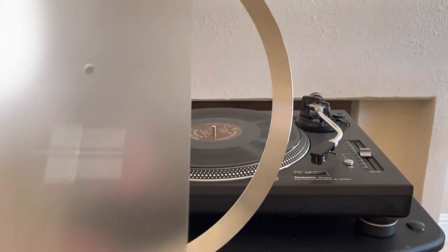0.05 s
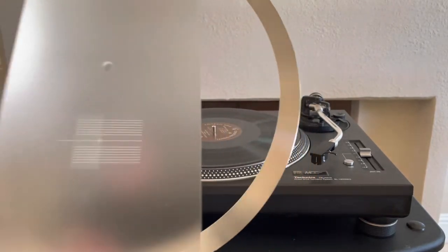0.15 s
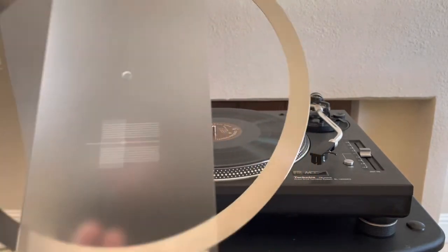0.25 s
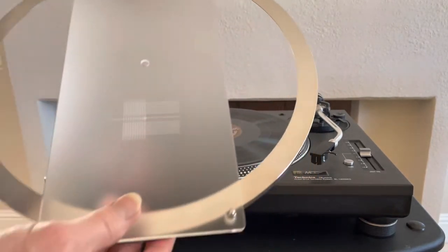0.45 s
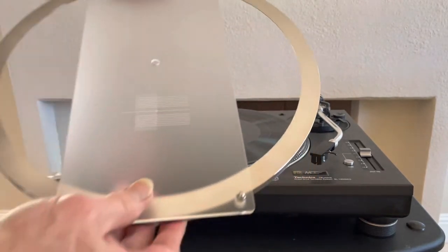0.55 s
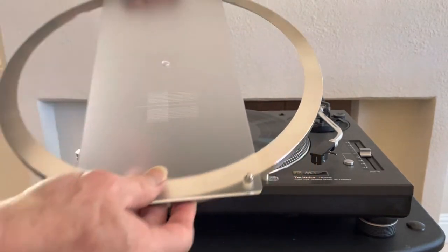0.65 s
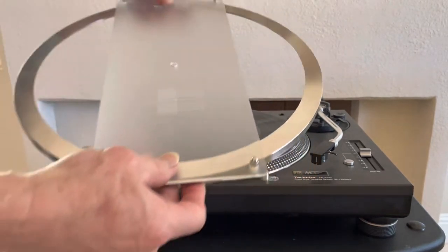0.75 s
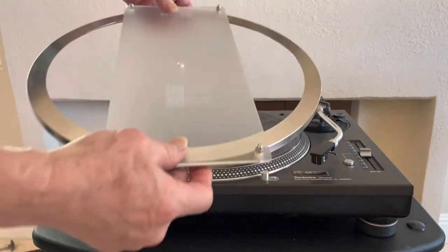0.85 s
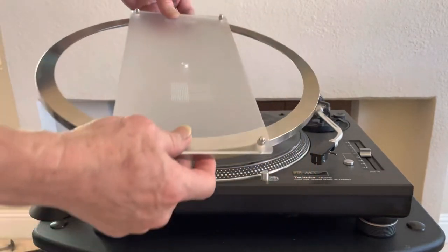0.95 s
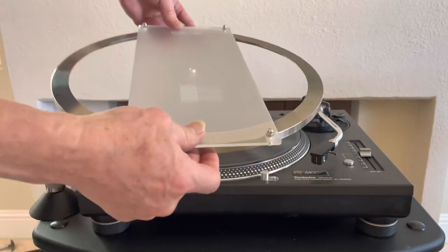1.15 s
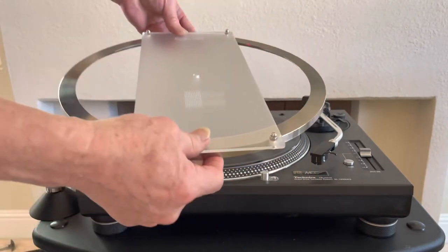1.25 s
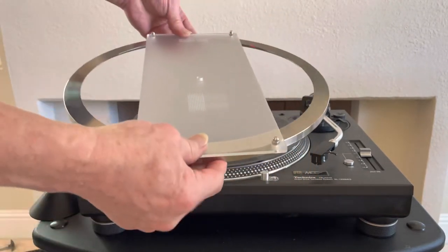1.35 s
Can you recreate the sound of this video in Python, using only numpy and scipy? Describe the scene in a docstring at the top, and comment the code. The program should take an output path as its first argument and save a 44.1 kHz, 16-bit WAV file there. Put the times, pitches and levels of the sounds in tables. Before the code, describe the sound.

A metal ring clacks sharply against a plastic plate, rings briefly, then knocks softly.

```python
"""A heavy metal ring rides on a hard plastic plate, carried through a quiet, bare room.
After a faint rub of the hands, the ring drops against the plate with one sharp clack:
the plate bends and thuds, and the metal sings briefly in beating pairs of modes.
It settles with a soft, damped double knock, then a light tap follows as the plate is set down.
Faint sliding and a low wobble come and go, over a steady bed of room rumble and hum."""
import sys
import numpy as np
from scipy import signal
from scipy.fft import rfft, irfft
from scipy.io import wavfile
from scipy.ndimage import uniform_filter1d

SR = 44100
rng = np.random.default_rng(int(sys.argv[2]) if len(sys.argv) > 2 else 0)


def inscribe(sig):
    """Save sig as 16-bit PCM at rate SR to the path in sys.argv[1].

    A 1-D sig is mono; a 2-D sig holds one channel per row.
    Samples are clipped to [-1, 1] before scaling.
    """
    pcm = np.round(np.clip(np.atleast_2d(sig).T, -1, 1) * 32767)
    wavfile.write(sys.argv[1], SR, pcm.astype(np.int16))


N = 61739

# The bright crack of the hard contact. Each row: frequency in Hz, level in dB.
CRACK_SPECTRUM = [(60, -37), (300, -20), (600, -26), (1100, -14.5), (1800, -15), (3200, -13), (4100, -7.5),
                  (5000, -4), (6300, -14), (7500, -19), (9800, -6), (11400, 3), (13500, -13.5),
                  (15800, -22)]
# Dense, quickly damped modes of plate and ring. Each row: frequency in Hz, level in dB.
CHATTER_SPECTRUM = [(100, -32.5), (280, -29), (450, -32.5), (1100, -24), (1800, -26), (3300, -29.5),
                    (5000, -20), (6300, -30.5), (9200, -34.5), (11500, -18.5), (13500, -34), (15500, -41)]
# The plate's bending modes. Each row: pitch in Hz, level in dB, t60 in seconds.
BENDING_MODES = [(57.2, -40, 0.37), (108, -31.5, 0.23), (255.5, -22, 0.11), (282.5, -28.5, 0.05),
                 (327.5, -35, 0.23), (728.5, -40.5, 0.089), (996, -36, 0.06), (1111.6, -30, 0.065),
                 (1464, -34, 0.07)]
# The ring's partials. Each entry: pitch in Hz.
RING_PITCHES = [3331, 4030, 4168, 4364, 4987, 5058, 5498, 6758, 8115, 11015, 11146, 12812, 14555]
# How each partial sings. Each row: level in dB, t60 in seconds, leftward pan in dB,
# phase between the channels in radians.
RING_VOICING = [(-37.5, 0.34, -0.5, 0.24), (-29.5, 0.063, 6, 0.27), (-35.5, 0.1, 1.5, 0.45),
                (-29.5, 0.21, 0.5, 0.53), (-29.5, 0.27, 2.5, 0.64), (-36.5, 0.074, 2.5, 2.3),
                (-37, 0.54, 3, 0.482), (-29.5, 0.23, -1.5, 1.2), (-33, 0.05, -0.5, 2.7),
                (-36, .12, 2.5, 0.91), (-37.5, 0.12, 2.5, 0.92), (-31.5, .13, -7, 0.83),
                (-35, .08, 3.5, 3.8)]
# The ring's soft knocks on the plate, and the tap of setting it down. Each row: start in seconds,
# level in dB, treble roll-off in Hz, t60 in seconds, leftward pan in dB.
KNOCK_HITS = [(0.6797, -28.5, 4430, 0.044, 4.5), (0.6818, -17.5, 880, 0.019, 0.5),
              (0.7105, -33.5, 2150, 0.038, 2)]
TAP_HITS = [(1.1208, -44, 5730, 0.041, 4)]
# The tone of knock and tap. Each row: frequency in Hz, level in dB.
KNOCK_SPECTRUM = [(60, -3), (270, 8.5), (450, -9.5), (760, 1.5), (950, -4), (1170, 10.5), (1450, -6),
                  (2300, -5.5), (4800, -16), (6300, -15), (12500, -7), (14500, -24)]
TAP_SPECTRUM = [(150, 4), (500, 2), (1000, 1), (1400, 4.5), (2000, -5.5), (4800, -3), (5900, -24),
                (14000, -16)]
# The ring slides, the hands shift their grip, the held plate wobbles.
# Each row: centre in seconds, half width in seconds, level in dB.
SLIDE_STROKES = [(0.075, 0.014, -72.5), (0.69, 0.042, -69.5), (0.856, 0.0046, -74.5), (0.98, 0.061, -76.5),
                 (1.37, 0.055, -79.5)]
RUB_STROKES = [(0.068, 0.025, -46), (0.64, 0.044, -51.5)]
WOBBLE_STROKES = [(0.11, 0.04, -40.5), (0.29, 0.022, -27), (0.46, .06, -33.5), (0.715, 0.055, -33)]
# Their tone: thin slide, dull rub, deep wobble. Each row: frequency in Hz, level in dB.
SLIDE_SPECTRUM = [(300, -33), (2000, 6.5), (6000, -16), (9500, 4.5), (12800, 6), (14300, -22), (16000, -25)]
RUB_SPECTRUM = [(60, 7), (140, -4), (300, 4.5), (700, -2.5), (1150, 1), (1800, -23), (5000, -24),
                (14000, -40)]
WOBBLE_SPECTRUM = [(25, -16.5), (55, 13), (90, -2), (140, 1.5), (210, -11.5), (290, -3.5), (500, -23),
                   (1500, -49.5), (8000, -61)]
# Where the clack sits. Each row: frequency in Hz, leftward pan in dB.
CLACK_PAN = [(100, -0.5), (700, 7), (2400, 8.5), (4600, 19), (8000, 0), (15000, 6.5)]
# Stereo width of direct and diffuse sound. Each row: frequency in Hz, left-right correlation.
DIRECT_CORRELATION = [(200, 1), (1500, .75), (5000, 0.87), (11000, 0.065)]
ROOM_CORRELATION = [(100, .97), (300, .8), (700, 0.28), (3000, 0.38), (12000, 0.23)]
# The bare room's reverb. Each row: frequency in Hz, level in dB, t60 in seconds.
REVERB_BANDS = [(100, -8.5, 0.21), (252, -15.5, 0.45), (591, -2, 0.57), (1120, -13, 1), (2100, -6, 0.78),
                (4674, -15, 0.98), (9100, -10.5, .47), (12200, -12.5, 0.52), (15100, -26.5, 0.24)]
# The room tone. Each row: frequency in Hz, level in dB.
ROOM_TONE_SPECTRUM = [(20, -51), (35, -46), (56, -35.5), (78, -39.5), (130, -46), (220, -53.5),
                      (500, -60.5), (1200, -68.5), (3000, -78.5), (6000, -80.5), (12000, -90), (16000, -99)]

CLACK_S, CLICK_DB, CRACK_T60_S, CHATTER_T60_S = 0.2338, 10, 0.014, 0.17
REBOUND_DELAY_S, REBOUND_CLICK_DB, SCRAPE_DB = 0.0013, 7, -1
TWIN_SHARP_RATIO, TWIN_DB = 1.0023, -9.5   # each ring mode beats against a weaker twin
RING_SEND_DB, KNOCK_SEND_DB, TAP_SEND_DB = 1, -2.5, 4   # reverb sends, relative to the clack's
HUM_HZ, HUM_DB = 57.3, -58
LOW_CUT_HZ, TOP_STOP_HZ = 55, 16900


def from_db(db):
    """Decibels to gain."""
    return 10 ** (np.asarray(db) / 20)


def at_hz(table, hz, column=1):
    """Read a column of a table on a log-frequency axis."""
    table = np.array(table, float)
    return np.interp(np.log(np.maximum(hz, 1)), np.log(table[:, 0]), table[:, column])


def pan(db):
    """Left and right gains; positive dB leans left."""
    return from_db(np.array([[.5], [-.5]]) * db)


def since(start_s):
    """Seconds since a moment, for every sample."""
    return np.arange(N) / SR - start_s


def decay(start_s, t60):
    """Instant attack, then a fall of 60 dB every t60 seconds."""
    t = since(start_s)
    return (t >= 0) * from_db(-60 * np.maximum(t, 0) / t60)


def bin_hz():
    """Frequencies of the spectrum's bins."""
    return np.arange(N // 2 + 1) * SR / N


def equalise(x, gain):
    """Weight a sound by frequency."""
    return irfft(rfft(x) * gain, N)


def noise(spectrum, correlation):
    """Steady stereo noise with a given tone and width."""
    mid, side = rfft(rng.standard_normal((2, N)))
    alike = np.clip(at_hz(correlation, bin_hz()), -1, 1)
    stereo = np.sqrt((1 + alike) / 2) * mid + np.sqrt((1 - alike) / 2) * side * np.array([[1], [-1]])
    return irfft(stereo * from_db(at_hz(spectrum, bin_hz())), N)


def mode(start_s, hz, db, t60, phase=0):
    """One struck resonance: a dying sine."""
    return from_db(db) * decay(start_s, t60) * np.sin(2 * np.pi * hz * since(start_s) + phase)


def clack():
    """The ring hits the plate and bounces straight back on it: two clicks, grit, chatter and a thud."""
    rebound_s = CLACK_S + REBOUND_DELAY_S
    scrape = from_db(SCRAPE_DB) * decay(rebound_s, CRACK_T60_S) * noise(CRACK_SPECTRUM, DIRECT_CORRELATION)
    chatter = decay(CLACK_S, CHATTER_T60_S) * noise(CHATTER_SPECTRUM, DIRECT_CORRELATION)
    clicks = click(CLACK_S, CLICK_DB) + click(rebound_s, REBOUND_CLICK_DB)
    placement = pan(at_hz(CLACK_PAN, bin_hz()))
    return equalise(clicks + scrape + chatter, placement) + plate_thud(CLACK_S, blow_db=0)


def click(start_s, db, left_lag_s=0.000023):
    """Hard contact makes one clean pulse, which reaches the right side first."""
    cepstrum = irfft(np.log(from_db(at_hz(CRACK_SPECTRUM, bin_hz()))), N)
    cepstrum[1:] *= 2   # minimum phase: nothing sounds ahead of the hit
    cepstrum[N // 2:] = 0
    arrival_s = np.round((start_s + np.array([[left_lag_s], [0]])) * SR) / SR
    return from_db(db) * irfft(np.exp(rfft(cepstrum) - 2j * np.pi * bin_hz() * arrival_s), N)


def plate_thud(start_s, blow_db, lag_s=0.0045):
    """A blow bends the plate; the slow bending waves arrive just after the contact."""
    return pan(5) * sum(mode(start_s + lag_s, hz, db + blow_db, t60) for hz, db, t60 in BENDING_MODES)


def metal_ring():
    """The clack sets the metal singing in pairs of close, beating modes."""
    out = 0
    for hz, (db, t60, pan_db, phase) in zip(RING_PITCHES, RING_VOICING):
        phases = phase * np.array([[-.5], [.5]])
        partial = mode(CLACK_S, hz, db, t60, phases)
        twin = mode(CLACK_S, hz * TWIN_SHARP_RATIO, db + TWIN_DB, t60, phases)
        out = out + pan(pan_db) * (partial + twin)
    return out


def soft_knocks(hits, spectrum):
    """Damped contacts: the softer the touch, the slower the attack and the less treble."""
    out = 0
    for start_s, db, dull_hz, t60, pan_db in hits:
        attack = 1 - np.exp(-np.maximum(since(start_s), 0) * dull_hz)
        burst = attack * decay(start_s, t60) * noise(spectrum, DIRECT_CORRELATION)
        lowpass = signal.butter(1, dull_hz, fs=SR)
        out = out + pan(pan_db) * from_db(db) * signal.lfilter(*lowpass, burst)
    return out


def friction(strokes, spectrum, rough_db):
    """Strokes that swell and fade, made grainy by stick and slip."""
    swell = sum(from_db(db) * np.exp(-.5 * (since(s) / half_s) ** 2) for s, half_s, db in strokes)
    grain = uniform_filter1d(rng.standard_normal(N), size=128)
    return swell * from_db(rough_db * grain / grain.std()) * noise(spectrum, ROOM_CORRELATION)


def reverb(send, predelay_s=0.0047):
    """The bare room returns a diffuse tail that dies at its own rate in each half octave."""
    centres = np.geomspace(40, 16000, 18)
    diffuse, response = noise(REVERB_BANDS, ROOM_CORRELATION), 0
    for hz, share in zip(centres, np.eye(len(centres))):
        band = equalise(diffuse, at_hz(np.c_[centres, share], bin_hz()))
        fall = decay(predelay_s, at_hz(REVERB_BANDS, hz, column=2))
        response = response + band * fall / np.linalg.norm(fall)
    mono = send.mean(axis=0, keepdims=True)
    return pan(3) * signal.fftconvolve(mono, response, axes=1)[:, :N]


def room_tone():
    """A bed of low rumble and faint hiss with a steady hum."""
    hum = from_db(HUM_DB) * np.sin(2 * np.pi * (HUM_HZ * since(0) + rng.random()))
    return pan(2) * (noise(ROOM_TONE_SPECTRUM, ROOM_CORRELATION) + hum)


def scene():
    """The mix: hits up front, their reverb behind, handling and room tone underneath."""
    blow, metal, tap = clack(), metal_ring(), soft_knocks(TAP_HITS, TAP_SPECTRUM)
    flex = plate_thud(KNOCK_HITS[0][0], blow_db=-24.5)   # the first knock also bends the plate
    settling = soft_knocks(KNOCK_HITS, KNOCK_SPECTRUM) + flex
    tail = reverb(blow + from_db(RING_SEND_DB) * metal
                  + from_db(KNOCK_SEND_DB) * settling + from_db(TAP_SEND_DB) * tap)
    slides = friction(SLIDE_STROKES, SLIDE_SPECTRUM, rough_db=2.5)
    rubs = friction(RUB_STROKES, RUB_SPECTRUM, rough_db=2.5)
    wobbles = friction(WOBBLE_STROKES, WOBBLE_SPECTRUM, rough_db=0.36)
    return blow + metal + settling + tap + tail + slides + rubs + wobbles + room_tone()


def record(dry):
    """The microphone rolls off the deep bass; then the peaks are rounded and the top is cut."""
    low_cut = signal.butter(2, LOW_CUT_HZ, "high", fs=SR, output="sos")
    top_cut = signal.cheby2(14, 70, TOP_STOP_HZ, fs=SR, output="sos")
    rounded = np.tanh(signal.sosfilt(low_cut, dry))
    return signal.sosfilt(top_cut, rounded)


dry = scene()
out = record(dry)
inscribe(out)
```